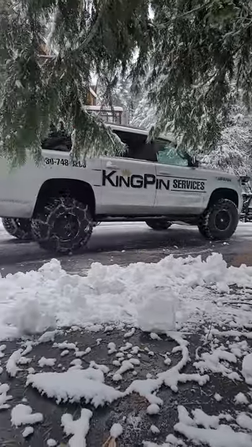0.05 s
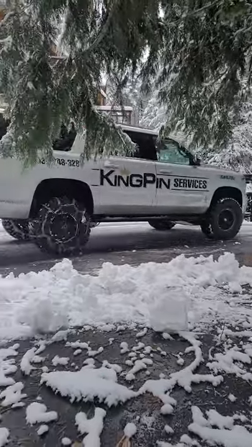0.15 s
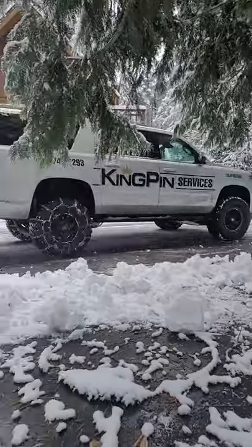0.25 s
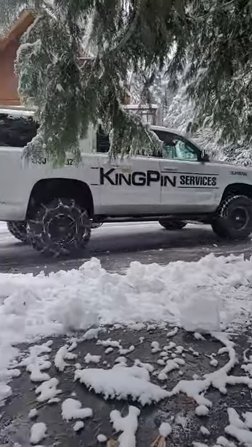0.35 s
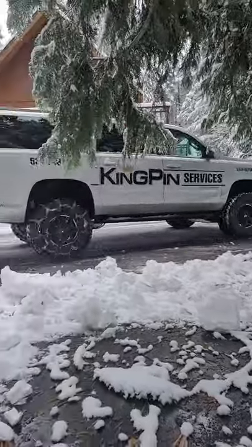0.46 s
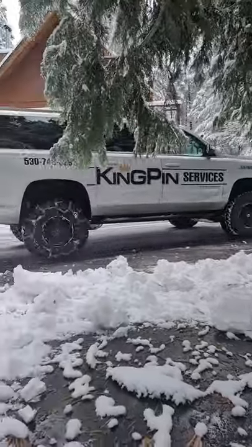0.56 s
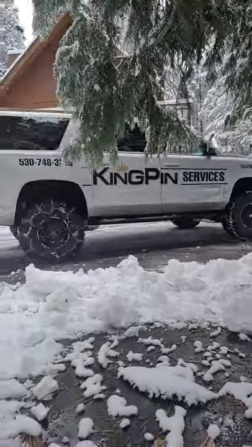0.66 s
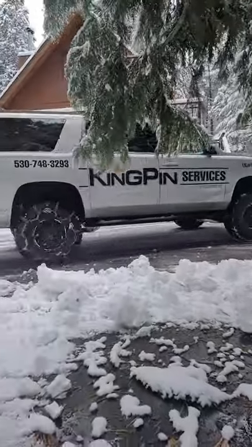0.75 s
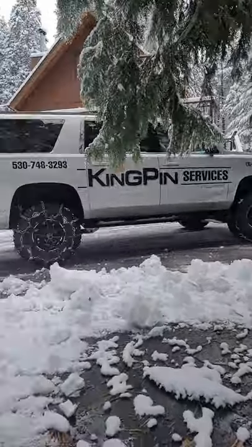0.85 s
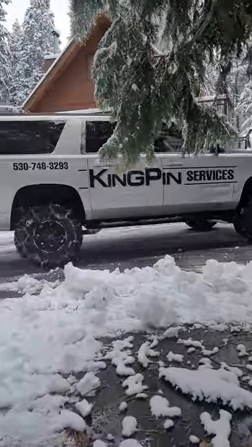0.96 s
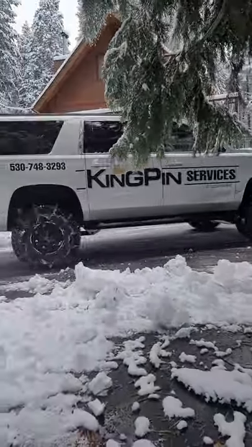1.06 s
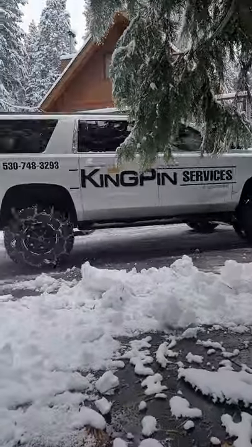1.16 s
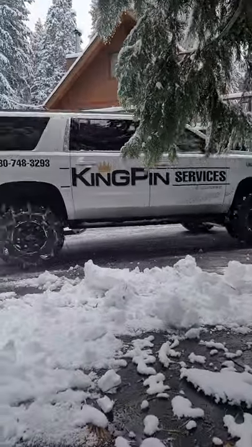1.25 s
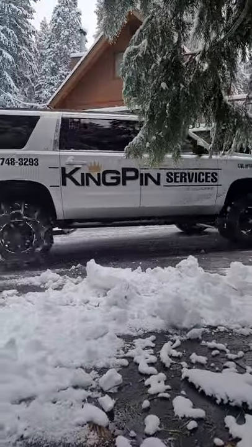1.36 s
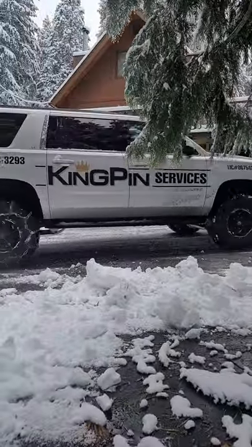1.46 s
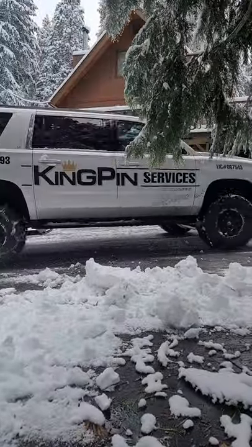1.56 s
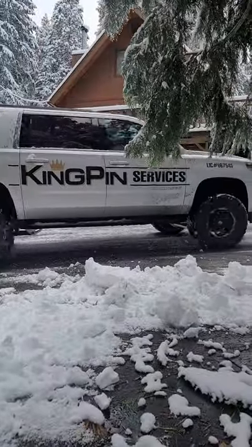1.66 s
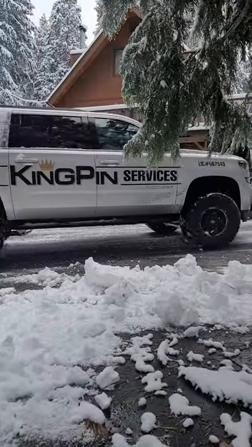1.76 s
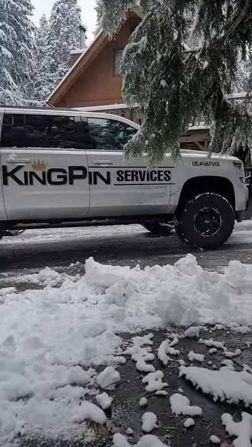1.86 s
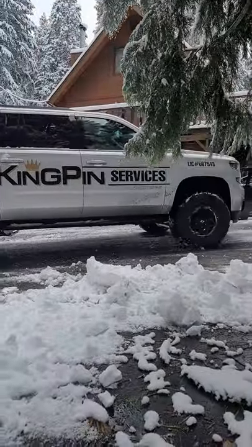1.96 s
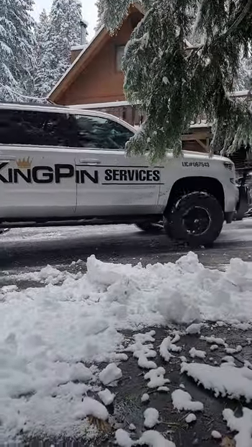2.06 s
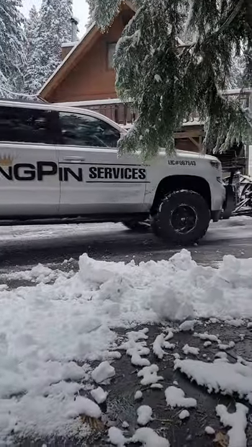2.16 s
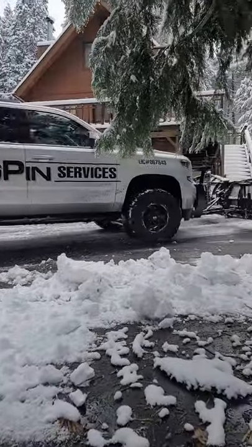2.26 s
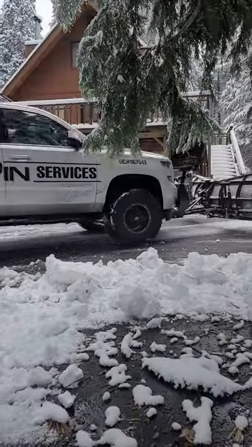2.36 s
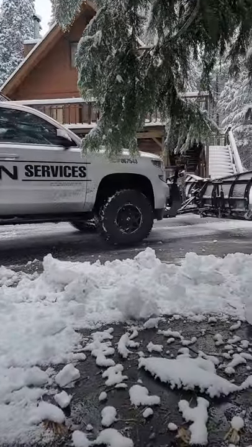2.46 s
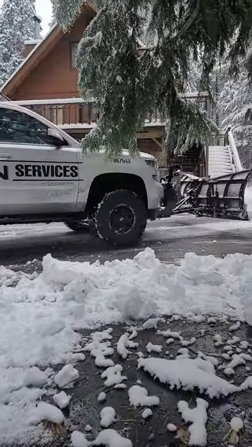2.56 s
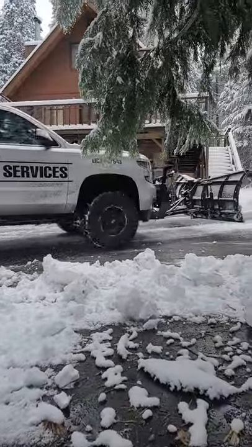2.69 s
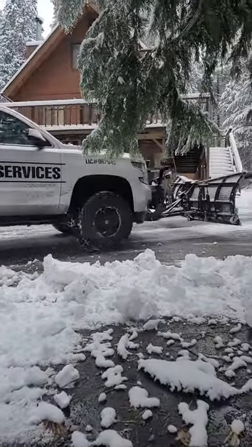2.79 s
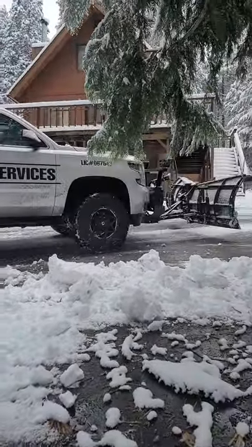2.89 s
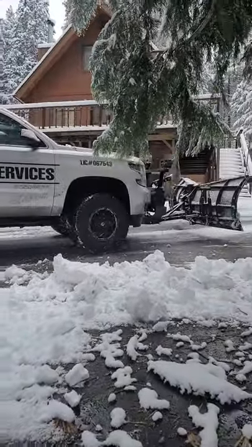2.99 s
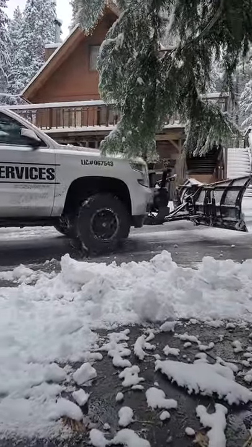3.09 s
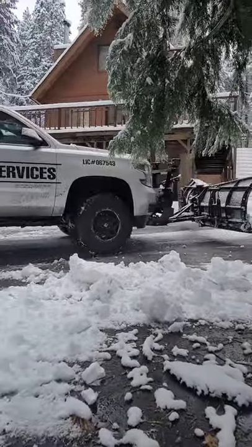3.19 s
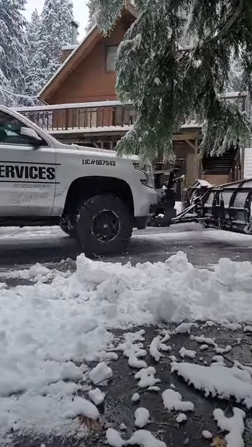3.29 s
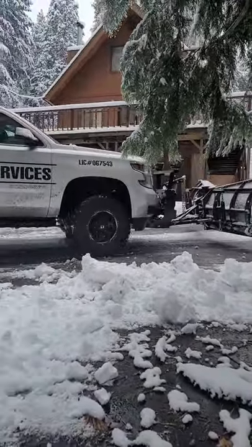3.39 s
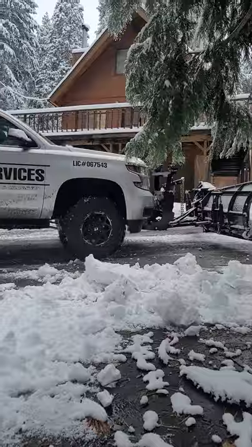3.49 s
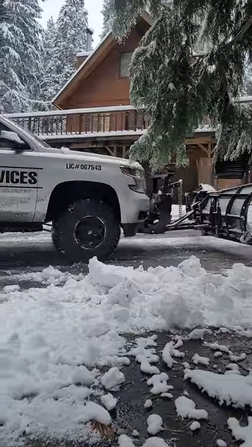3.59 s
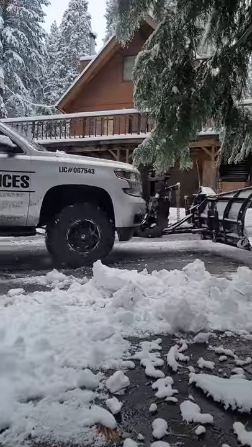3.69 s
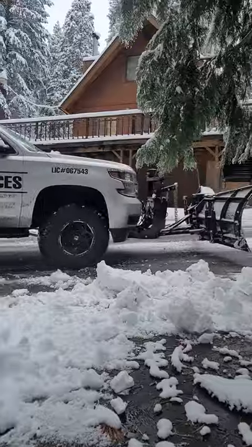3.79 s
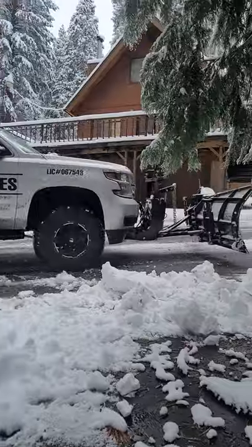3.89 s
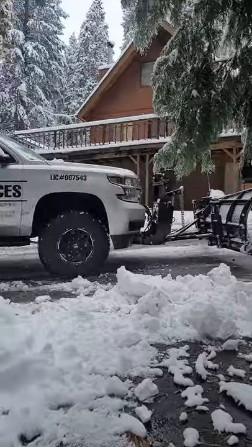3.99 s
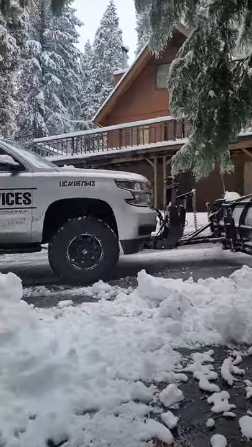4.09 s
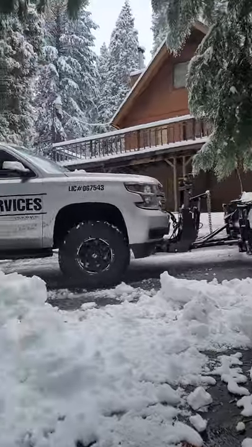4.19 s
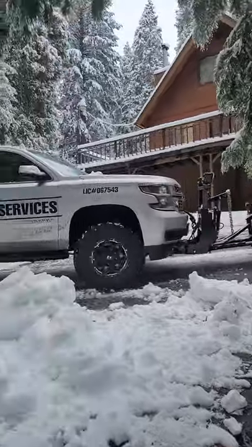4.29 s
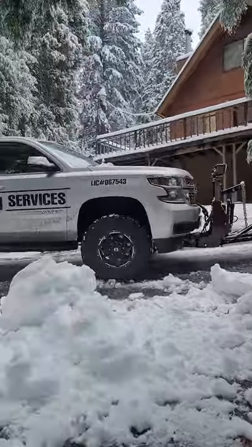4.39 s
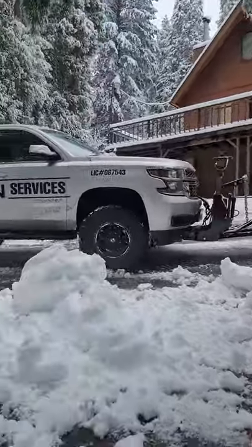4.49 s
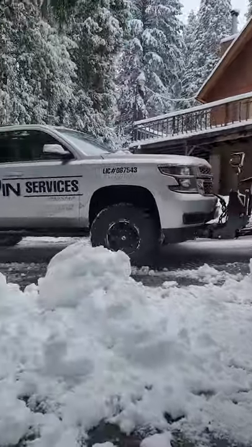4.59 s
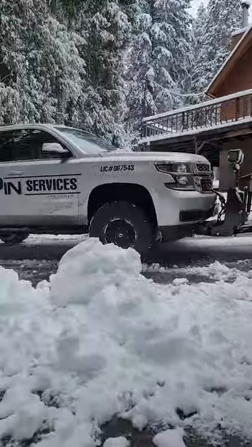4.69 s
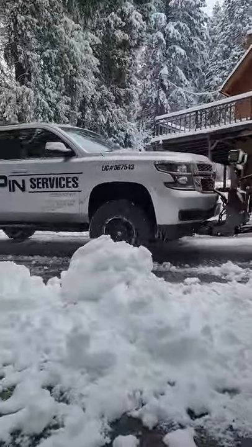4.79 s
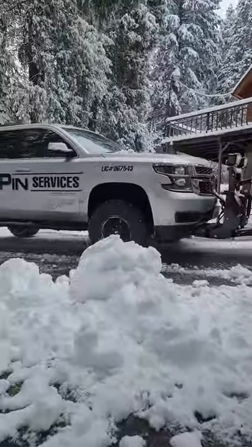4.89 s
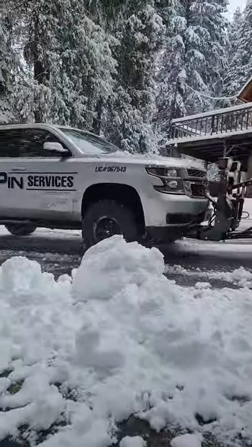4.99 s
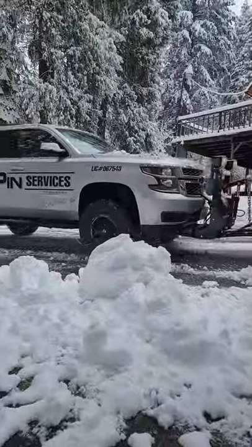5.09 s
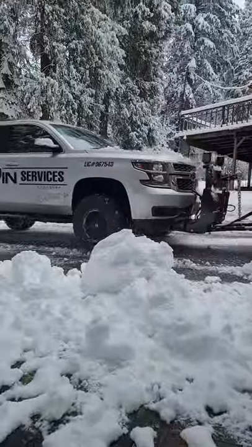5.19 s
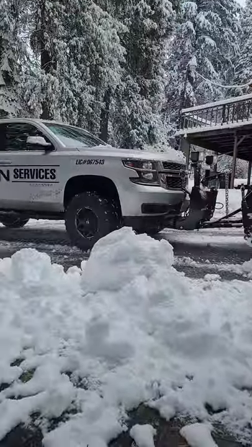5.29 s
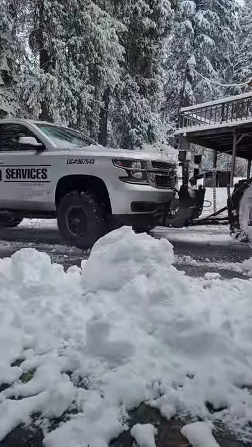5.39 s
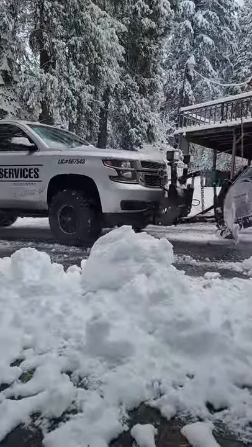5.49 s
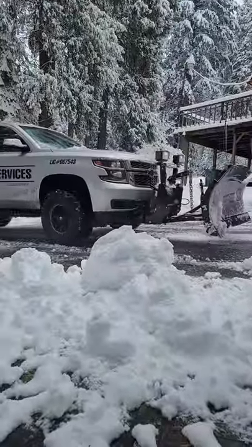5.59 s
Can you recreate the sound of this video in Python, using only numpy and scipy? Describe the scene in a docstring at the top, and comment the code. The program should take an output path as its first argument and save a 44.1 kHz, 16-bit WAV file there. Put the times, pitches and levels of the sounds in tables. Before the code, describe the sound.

A V8 engine burbles low as a vehicle creeps over slush, tyre chains clinking and a steel plough blade scraping the ground.

```python
"""A V8 four-wheel drive reverses slowly over slushy asphalt, close to a phone's stereo microphone.
Its cross-plane exhaust burbles, each firing beating the pipe and ringing the silencer, and sinks to idle.
Tyre chains tick and crunch over the hum of the running gear. The steel plough blade scrapes the ground
in strokes, ringing and whistling. Late on, a pump whines and there is one soft thud."""
import sys
import numpy as np
from scipy import signal
from scipy.fft import rfft, irfft, next_fast_len
from scipy.io import wavfile
from scipy.ndimage import uniform_filter1d, map_coordinates

SR = 44100
rng = np.random.default_rng(int(sys.argv[2]) if len(sys.argv) > 2 else 0)


def bounce(signal):
    """Save signal as a 16-bit WAV file at the path given by the first command-line argument."""
    frames = np.transpose(np.atleast_2d(signal))
    limited = np.clip(frames, -1, 1)
    pcm = np.round(limited * 32767).astype(np.int16)
    wavfile.write(sys.argv[1], SR, pcm)


N = 249165

# Tone of chain biting slush. Each row: frequency in Hz, spectral level in dB.
CRUNCH_SPECTRUM = [(1470, -58), (2500, -1), (2810, -9), (3710, -1), (4260, -8.5), (6840, 1), (7500, -3),
                   (8360, -3.5), (9250, -11.5), (11300, -5.5), (14700, -7), (15900, -3)]


def engine():
    """Each firing beats the pipe, rings the silencer and puffs gas; the two banks take turns unevenly."""
    # Each row: time in seconds, crank speed in rpm, exhaust beat in dB, silencer ring in dB.
    run_down = [(0.0, 782.7, -28, -30.5), (0.5, 714.2, -33, -28.5), (1.0, 683.2, -33.0, -29),
                (1.5, 687.8, -34, -29.5), (2.0, 668.7, -32.0, -32.5), (2.5, 609.4, -37.5, -38.5),
                (3.25, 570.2, -38.5, -36.0), (3.5, 593, -37, -34.5), (4.0, 558.6, -37.5, -42),
                (4.75, 541, -37.5, -42), (5.5, 536.4, -39, -42), (5.65, 542, -38.5, -45)]
    # In firing order. Each row: bank 0 or 1, beat in dB, ring in dB, header lag in ms, tailpipe tap in dB.
    cylinders = [(0, 6.5, 11, 0.32, 7.5), (0, 6.5, 12, 1.36, 8.5), (1, 2.75, 2, 2.06, -1),
                 (0, 5.5, 7, 0.016, -1), (1, 3, 10, 1.73, 3.5), (1, 2, 2.5, 1.17, 1),
                 (0, 7.5, 8.5, 0.26, 1), (1, 3.5, 8.5, 1.58, 1)]
    # Exhaust resonances. Each row: frequency in Hz, width in Hz, signed gain from bank 0, from bank 1.
    pipe = [(44.4, 11.9, -0.25, -0.22), (65.7, 19.3, 0.25, -0.2), (119.4, 37, 0.088, 0.32)]
    silencer = [(164.56, 23.1, -1.285, 1), (162.6, 9.2, 0.33, -0.49), (168.84, 21.5, 1.122, -1.127),
                (203, 22.8, 0.052, 0.14)]
    # Resonances of the gas rush. Each row: frequency in Hz, width in Hz, level in dB.
    tailpipe = [(238.6, 26, 2), (305.3, 22.4, 1.5), (417.5, 30.7, 1)]
    rpm, beat_db, ring_db = curves(run_down)
    firings = np.floor(np.cumsum(rpm / 15) / SR - 0.104)  # four to a crank turn
    at = np.flatnonzero(np.diff(firings)) + 1
    bank, own_beat_db, own_ring_db, lag_ms, tap_db = np.array(cylinders)[firings[at].astype(int) % 8].T
    jitter = rng.standard_normal((len(at), 3))
    turn_samples = 60 * SR / rpm[at]  # slower firings make bigger pulses
    beat = turn_samples * amp(beat_db[at] + own_beat_db + 0.58 * jitter[:, 0])
    ring = turn_samples * amp(ring_db[at] + own_ring_db + 0.8 * jitter[:, 1])
    lag = np.round((lag_ms + 0.04 * jitter[:, 2]) * SR / 1000).astype(int)
    at = np.clip(at + lag, 0, N - 1)
    burble = 0
    for size, modes in (beat, pipe), (ring, silencer):
        pulses = np.array([np.bincount(at, size * (bank == b), N) for b in range(2)])
        response = lambda f: sum(mode(f, hz, w) * np.array([[a], [b]]) for hz, w, a, b in modes)
        burble = burble + filtered(pulses, response).sum(axis=0)
    muffling = lambda f: 1 / (1 + 1j * f / 260) ** 2 / (1 + (f / 230) ** 8)  # the silencer kills the highs
    burble = filtered(burble, muffling)
    puffs = signal.lfilter([1], [1, -np.exp(-1 / (0.0029 * SR))], np.bincount(at, amp(own_beat_db), N))
    taps = 0.8 * unit(np.bincount(at, amp(tap_db), N))  # the regular part of each puff
    gas = taps + unit((1.1 + puffs) * grit(patchy_db=0.5))
    rush = unit(filtered(gas, lambda f: body(tailpipe)(f) / (1 + (f / 520) ** 6)))
    leaves_s, fade_db_per_s = 1.21, 3  # the tailpipe draws away from the microphone
    rush_db = -41.5 - fade_db_per_s * np.clip(np.arange(N) / SR - leaves_s, 0, None)
    return [burble, 0.22 * np.roll(burble, 900)] + amp(rush_db) * rush


def blade():
    """The edge grinds grit into a hiss and shakes the plate's resonances, each with its own chatter."""
    # Each row: frequency in Hz, spectral level in dB.
    edge_hiss = [(1470, -28), (2500, -4.5), (2970, -7.5), (3780, 0.5), (4410, -7.5), (4860, -3),
                 (5150, -18.5), (6460, 2.5), (7500, -3), (8170, 2), (9000, -13.5), (11700, -8.5),
                 (19800, -120)]
    fine_grit = [(8800, -40), (9500, -18), (10600, -10), (11400, 9), (12200, 13.5), (13200, 7),
                 (14300, 7.5), (15500, 12), (16000, -19)]
    # Resonances of the steel. Each row: frequency in Hz, width in Hz, level in dB.
    low_ring = [(617, 93, 2.5), (700, 67, 3), (783, 28.5, 4.5), (1004, 350, -10)]
    middle_ring = [(1129, 26, 9), (1277, 78, 7.7)]
    high_ring = [(1533, 160, 0.5), (1772, 20, -1), (1846, 29, 7.5), (2077, 335, -1)]
    squeal = [(5112, 140, -1.1), (5520, 70, 1), (5860, 47, 1)]
    colours = tint(edge_hiss), tint(fine_grit), *map(body, (low_ring, middle_ring, high_ring, squeal))
    out = 0
    for gain, colour, patchy_db in zip(blade_contact(), colours, (3.5, 3.5, 1, 1.5, 2.5, 2)):
        chatter = amp(0.43 * wobble(30) + 0.36 * wobble(120))
        out = out + gain * chatter * unit(filtered(grit(patchy_db), colour))
    return out


def blade_contact():
    """Gains of the six blade layers: strokes touch, bite, sag and fade; the plate shudders as it catches."""
    # Each row: touch, lift and fade t60 in seconds, edge hiss in dB, sag by the lift in dB (negative
    # swells), then fine grit, low ring, middle ring, high ring and squeal in dB over the hiss.
    strokes = [(-.05, 0.06, .1, -41, 5.5, -10, -8, -20, -10, -14),
               (1.554, 1.819, 0.15, -37, 17, -8.5, -28, -14, -8.5, -5),
               (2.011, 2.635, .4, -37.5, -0.5, -1.5, -13, -15.5, -10, -6),
               (2.764, 3.208, 0.25, -38, 3.5, -1, -9, -14.5, -9, -7),
               (3.231, 3.272, .12, -36, 4.8, -3, -21, -13, -11, -8.5),
               (3.856, 4.032, 0.075, -48, 7, -10, -2.5, -3, -7.5, -20),
               (4.105, 5.283, 0.67, -35.5, 5, -2.5, -7.5, -17.5, -9, -9),
               (5.372, 5.458, 0.46, -41, 1.5, 0, -2.5, -28, -10.5, -5),
               (5.491, 5.7, .3, -44.5, -11, 2.5, -1.5, -21, -9.5, -7)]
    # One value a layer: time constant of the bite in seconds, and how far under it starts in dB.
    bite_s = np.c_[[.035, .03, .08, .07, .05, .05]]
    bite_db = np.c_[[5, 4, 12, 11, 7, 8]]
    # Each row: peak time, build-up and t60 in seconds, then low, middle and high ring in dB.
    shudders = [(1.689, 0.081, 0.72, -34, -33, -37.5), (1.743, 0.12, 0.4, -41, -30.5, -27.5),
                (2.255, 0.0602, 0.27, -45.5, -65, -68), (4.295, 0.11, 0.12, -43, -47, -62),
                (4.37, 0.034, 0.28, -48, -52, -56), (4.72, 0.26, 1, -41.5, -70, -48),
                (4.87, 0.041, 0.2, -43, -64, -45)]
    # The t60 of the low, middle and high ring as multiples of the shudder's.
    linger = np.array([1.1, 1.3, .7])
    t, power = np.arange(N) / SR, np.zeros((6, N))
    for touch, lift, t60, hiss_db, sag_db, *over_db in strokes:
        since = np.clip(t - touch, 0, None)
        onset = np.clip(since / 0.022, 0, 1) ** 2
        sag = np.clip(since / (lift - touch), 0, 1) ** 4.4  # comes late in the stroke
        db = hiss_db - bite_db * np.exp(-since / bite_s) - sag_db * sag
        gain = onset * amp(db - 60 * np.clip(t - lift, 0, None) / t60)
        power += (amp(np.c_[[0, *over_db]]) * gain) ** 2
    for peak, build, t60, *ring_db in shudders:
        onset = np.clip(1 + (t - peak) / build, 0, 1) ** 2
        decay = amp(-60 * np.clip(t - peak, 0, None) / np.c_[t60 * linger])
        power[2:5] += (amp(ring_db)[:, None] * onset * decay) ** 2
    return np.sqrt(power)


def blade_whistles():
    """Friction noise from the skidding edge briefly locks onto one resonance, swelling and fading."""
    # Each row: centre and half length in seconds, pitch and width in Hz, level in dB.
    flares = [(1.61, .06, 3780, 60, -49), (1.63, .06, 5600, 200, -43), (1.72, .08, 1280, 30, -38),
              (2.045, .03, 12200, 1500, -39), (2.13, .13, 6400, 200, -44), (2.46, .18, 5172, 26, -40),
              (2.51, .14, 5400, 500, -41), (2.55, .09, 5460, 44, -49), (2.93, .2, 885, 150, -48),
              (4.14, .045, 936, 73, -47), (4.24, .1, 1200, 60, -47), (4.3, .05, 6500, 3000, -39),
              (4.43, .02, 1482, 120, -38), (4.75, .3, 11300, 360, -41), (4.85, .04, 1950, 150, -39)]
    out, t, rub = 0, np.arange(N) / SR, rng.standard_normal((2, N))
    for s, half_s, hz, width, db in flares:
        swell = np.cos(np.pi / 2 * np.clip((t - s) / half_s, -1, 1)) ** 2
        out = out + amp(db) * swell * unit(filtered(rub, lambda f: mode(f, hz, width) ** 2))
    return out


def chain_links():
    """Every slap of a link is a crack and a short steel ring; the chain also knocks dully on the ground."""
    # Each row: start in seconds, level in dB.
    slaps = [(0.205, -26.5), (0.3253, -21), (0.442, -21.5), (0.467, -22), (0.556, -23), (0.7547, -24),
             (0.777, -29), (1.0187, -26), (1.0964, -22.5), (1.25, -27), (1.29, -25.5), (1.3254, -25),
             (1.3666, -23), (1.466, -30), (1.512, -25.5), (1.8786, -31), (3.4287, -30.5), (3.527, -29.5),
             (3.684, -19.5), (3.7326, -28)]
    # Modes of a link. Each row: frequency in Hz, level in dB, t60 in seconds.
    steel = [(2510, -18, 0.23), (2730, -10, 0.092), (3160, -15, 0.11), (3900, -5.5, .08), (5690, -4, 0.048),
             (7380, -47, 0.039), (11660, -5, .05), (12750, -13, .06), (13910, -18, .07)]
    # Each row: start in seconds, level in dB, centre in Hz, t60 in seconds.
    knocks = [(0.329, -29, 1400, 0.029), (.394, -36, 750, 0.068), (.526, -32.5, 2240, 0.021),
              (1.095, -40.5, 700, 0.055), (3.684, -38.5, 2410, 0.16)]
    near_s = 1.55  # fainter slaps fall at random while the rear wheels are near the microphone
    ticks = [(near_s * u, -38.5 + 4 * (2 * v - 1)) for u, v in rng.random(size=(40, 2))]
    out, cracks = np.zeros((2, 2, N + SR))
    t = np.arange(SR // 8) / SR
    rise = 1 - np.exp(-t / .0015)
    burst = lambda db, t60: amp(db - 60 * t / t60) * rise * rng.standard_normal((2, len(t)))
    for s, db in slaps + ticks:
        ring = sum(amp(level + rng.normal(0, 1.9) - 60 * t / t60) * np.sin(2 * np.pi * hz * t)
                   for hz, level, t60 in steel)
        ring_db = db - 25 + 3 * s  # later links ring more freely, clear of the slush
        out[:, round(s * SR):][:, :len(t)] += amp([[-.1], [-6]]) * amp(ring_db) * ring
        cracks[:, round(s * SR):][:, :len(t)] += burst(db - 11, t60=0.04)
    for s, db, hz, t60 in knocks:
        ground = signal.butter(2, [.7 * hz, 1.4 * hz], "band", fs=SR)
        out[:, round(s * SR):][:, :len(t)] += signal.lfilter(*ground, burst(db, t60)) * np.sqrt(SR / hz)
    return out[:, :N] + filtered(cracks[:, :N], lambda f: unit(tint(CRUNCH_SPECTRUM)(f)))


def rolling():
    """Running gear hums while links and slush crunch in dense, soft bursts under the tyres."""
    # Each row: frequency in Hz, spectral level in dB.
    gear_spectrum = [(420, -20), (560, -11), (700, -3.5), (900, -10.5), (1200, -6.5), (2200, -5),
                     (3200, -12.5), (4300, -15.5), (6000, -24.5), (9000, -52)]
    # The crunch drops as the rear wheels leave the microphone. Each row: time in seconds, level in dB.
    crunch_levels = [(0, -49), (.8, -47.5), (1.45, -50), (1.8, -57), (3.5, -55.5), (5.65, -51)]
    gear_db = -50 - 0.17 * np.arange(N) / SR + 0.71 * wobble(13)  # slowly drawing away
    gear = unit(filtered(grit(patchy_db=3.5), tint(gear_spectrum)))
    when, size = rng.random((2, 500))
    impacts = np.bincount((when * N).astype(int), size ** 2, N)
    fade = np.exp(-1 / (0.0063 * SR))
    bursts = signal.lfilter([1], [1, -2 * fade, fade ** 2], impacts)  # soft rise and fall
    crunch = unit(filtered((1 + unit(bursts)) * grit(patchy_db=1), tint(CRUNCH_SPECTRUM)))
    crunch_db, = curves(crunch_levels)
    return amp(gear_db) * gear + amp(crunch_db) * crunch


def pump():
    """The pump comes on with a thin, slightly unsteady whine."""
    # Each row: time in seconds, pitch in Hz, level in dB.
    pump_run = [(4.9, 990, -80), (4.97, 990, -56), (5.2, 990, -53), (5.65, 990, -56)]
    hz, db = curves(pump_run)
    phase = 2 * np.pi * np.cumsum(hz + 3 * wobble(15)) / SR
    running = db > -79
    whine = amp(db + 1.5 * wobble(12)) * np.sin(phase) * running
    return np.array([whine, 0.25 * whine])


def thud(start_s=5.261):
    """One soft, low push with a panel's higher note, all direct sound."""
    t = np.clip(np.arange(N) / SR - start_s, 0, None)
    push = amp(-19.5 - 60 * t / 0.076) * np.sin(2 * np.pi * 51 * t)
    panel = amp(-27 - 60 * t / 0.068) * np.sin(2 * np.pi * 290 * t)
    return np.array([push + panel, np.zeros(N)])


def amp(db):
    return 10 ** (np.asarray(db) / 20)


def unit(x):
    return x / np.sqrt(np.mean(x ** 2) + 1e-20)


def along(points, hz):
    """Interpolate (Hz, value) points on a log axis."""
    f, v = np.transpose(points)
    return np.interp(np.log(hz + 1), np.log(f + 1), v)


def curves(rows):
    """One value per sample for each column after the time."""
    s, *cols = np.transpose(rows)
    return np.array([np.interp(np.arange(N) / SR, s, c) for c in cols])


def wobble(rate):
    """A smooth random curve, rate knots a second."""
    return map_coordinates(rng.standard_normal(int(N * rate / SR) + 4), [np.arange(N) * rate / SR])


def filtered(x, response):
    """x through a complex response of frequency."""
    m = next_fast_len(N + SR // 2)
    return irfft(rfft(x, m) * response(np.fft.rfftfreq(m, 1 / SR)), m)[..., :N]


def mode(f, hz, width):
    """One causal resonance of peak gain 1."""
    return 1j * f * width / (hz * hz - f * f + 1j * f * width)


def body(modes):
    """A response made of (Hz, width, dB) resonances, neighbours in opposite phase."""
    return lambda f: sum((-1) ** k * amp(db) * mode(f, hz, w) for k, (hz, w, db) in enumerate(modes))


def tint(points):
    """A response through (Hz, dB) points."""
    return lambda f: amp(along(points, f))


def grit(patchy_db):
    """Two unrelated noises sharing narrow, short-lived streaks of random gain."""
    spectra = signal.stft(rng.standard_normal((2, N)), nperseg=1024)[2]
    patches = uniform_filter1d(rng.standard_normal(spectra.shape[1:]), size=3, axis=0)
    streaks = uniform_filter1d(patches, size=6, axis=1)
    return signal.istft(spectra * amp(patchy_db * unit(streaks)), nperseg=1024)[1][:, :N]


def scene():
    """Direct and scattered sound from the vehicle mix at the microphone's two ports."""
    # Each row: frequency in Hz, left-right likeness from 0 to 1.
    likeness = [(60, .96), (150, .985), (300, .93), (600, .92), (1200, .72), (2500, .62), (5000, .56),
                (9000, .4), (14000, .33)]
    # Each row: frequency in Hz, left minus right in dB.
    balance = [(60, -2.5), (110, 0.5), (200, -0.5), (380, -5), (700, 3.5), (1000, 0), (1400, -0.5),
               (2380, -7), (4400, -1.6), (8120, 6), (12000, -3.5), (15500, 7)]
    # Each row: frequency in Hz, phase lead of the left port in radians.
    lead = [(0, 0), (160, .12), (1300, .25), (1900, -.4), (2300, .9), (3700, 2.1), (7700, 9.3), (15500, 21)]
    parts = engine() + rolling() + chain_links() + blade() + blade_whistles() + pump() + thud()
    angle = lambda f: np.arccos(along(likeness, f)) / 2
    # The direct part feeds the middle, the scattered part the sides.
    mid, side = filtered(parts, lambda f: np.array([np.cos(angle(f)), np.sin(angle(f))]))
    half = np.array([[.5], [-.5]])
    ports = lambda f: amp(half * along(balance, f)) * np.exp(1j * half * np.interp(f, *np.transpose(lead)))
    return filtered(np.array([mid + side, mid - side]), ports)


def record(dry):
    """The phone picks up nothing above its band limit."""
    return filtered(dry, lambda hz: hz < 15900)


dry = scene()
out = record(dry)
bounce(out)
```